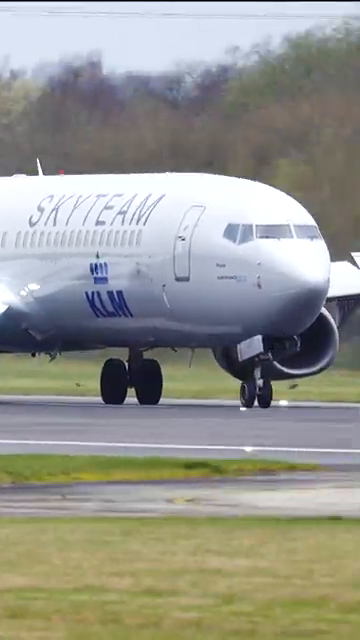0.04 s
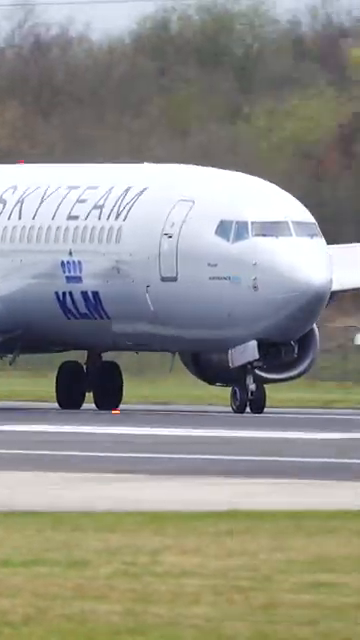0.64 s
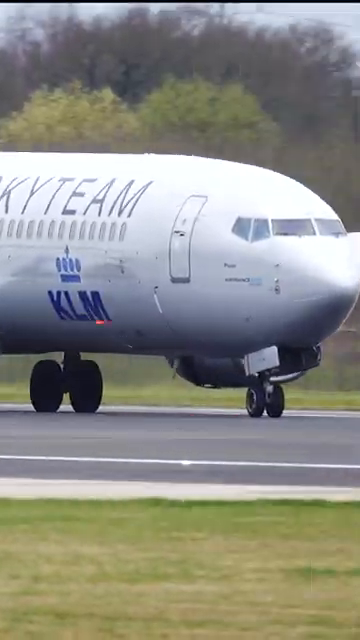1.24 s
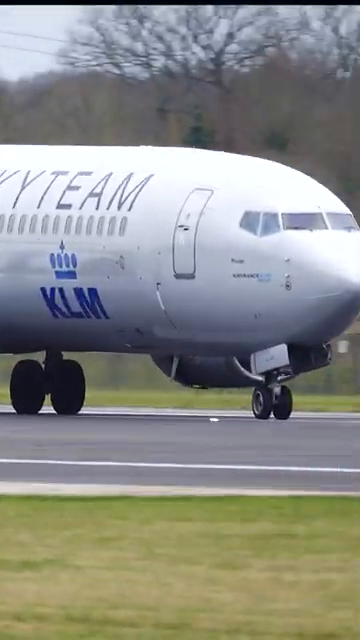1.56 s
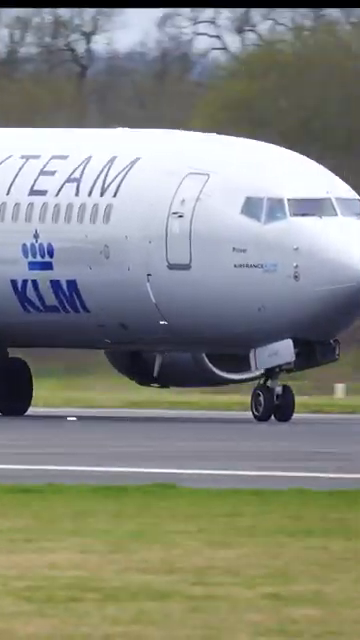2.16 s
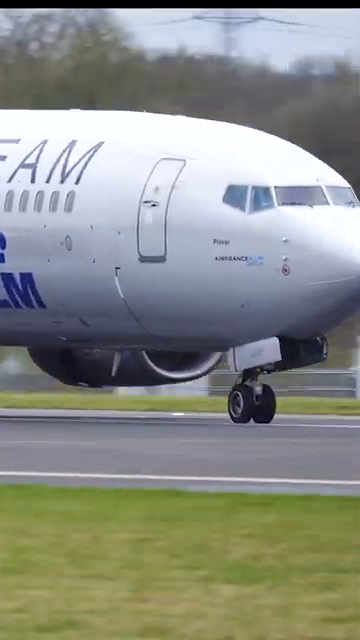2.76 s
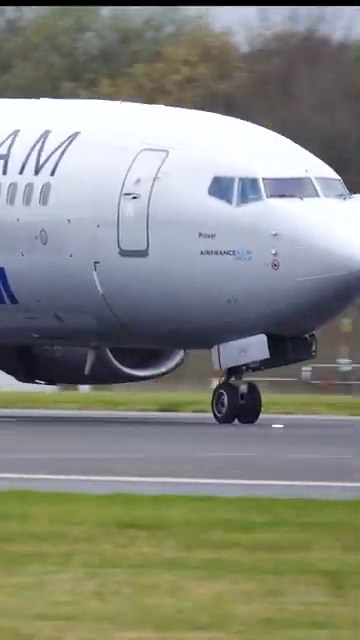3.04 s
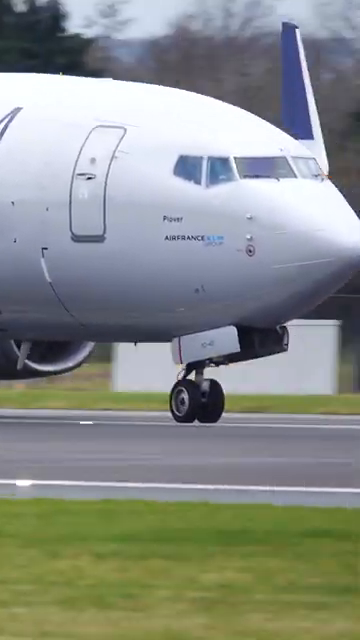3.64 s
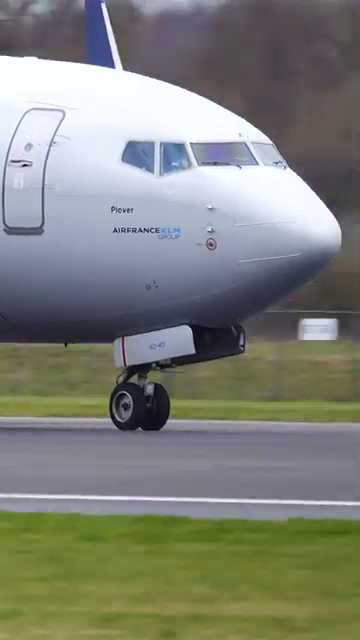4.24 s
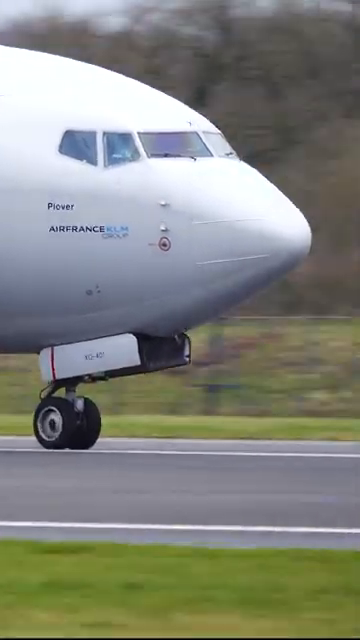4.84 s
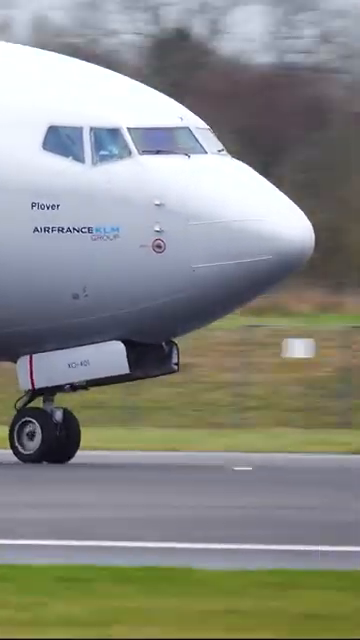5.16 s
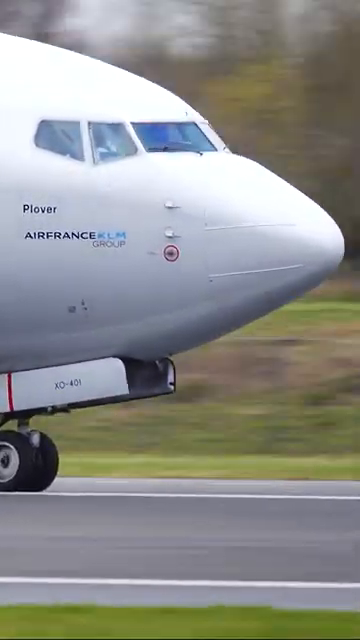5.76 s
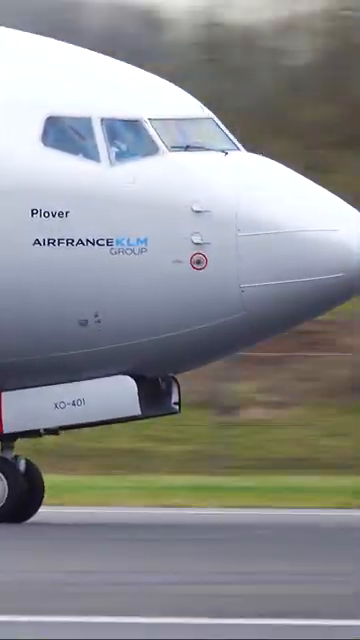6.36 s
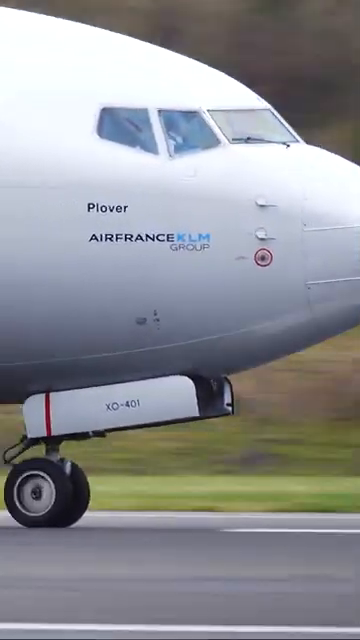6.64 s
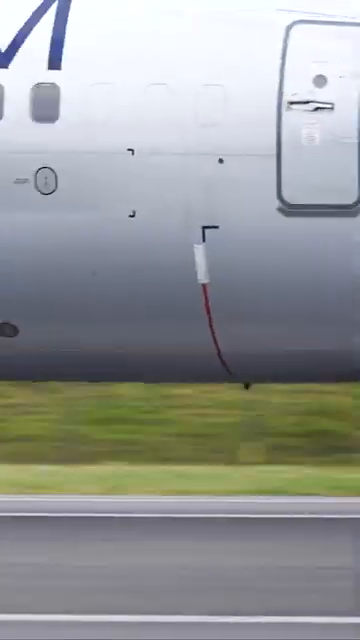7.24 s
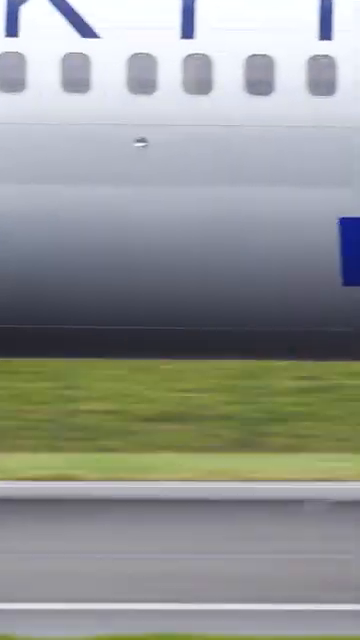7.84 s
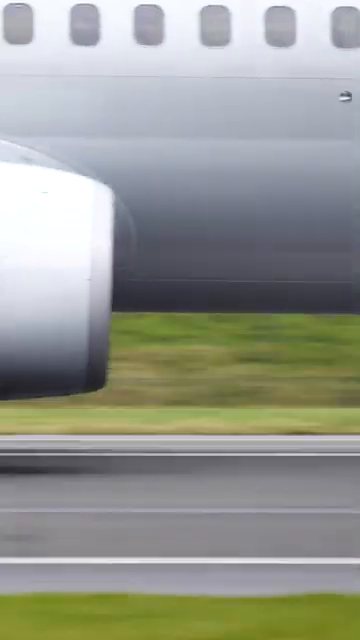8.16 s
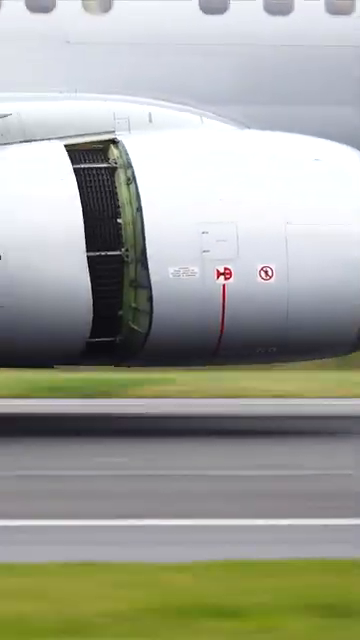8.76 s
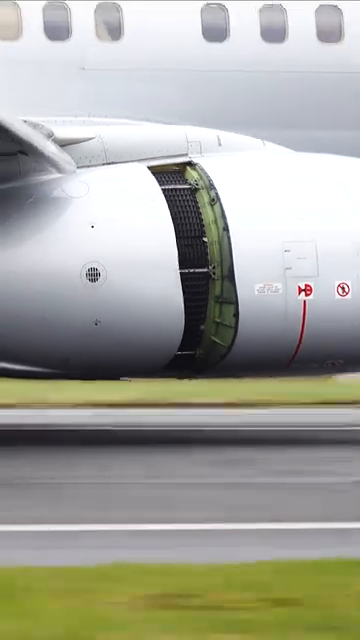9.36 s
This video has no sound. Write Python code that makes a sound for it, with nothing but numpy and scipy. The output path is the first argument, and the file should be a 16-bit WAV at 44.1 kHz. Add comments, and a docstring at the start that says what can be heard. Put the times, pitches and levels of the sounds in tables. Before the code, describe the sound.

Outdoors beside a runway, a lark's thin song sits over the deep rumble of a distant airliner. The jet rolls nearer on reverse thrust, moaning softly and giving two dull thumps, while a faint whine falls as the engines slow. The rumble gives way to a gusty roar and bright hiss, with a slow phasing sweep and a brief low hum as the aircraft comes alongside the microphone.

```python
"""A low, distant rumble is heard first, with a lark singing over it until the noise drowns the bird.
A jet airliner rolls down a runway on reverse thrust, comes closer and draws level with the listener.
The rumble of its turbulent exhaust, with a hollow moan and two dull thumps, gives way to the roar and
hiss of the reversers, and faint turbine whines sink as the engines slow. Interference between the
direct sound and its echo off the grass sweeps a comb through the noise."""
import sys
import numpy as np
from scipy import signal
from scipy.fft import rfft, irfft, next_fast_len
from scipy.io import wavfile
from scipy.ndimage import uniform_filter1d

SR = 44100
rng = np.random.default_rng(int(sys.argv[2]) if len(sys.argv) > 2 else 0)


def log_audio(samples):
    """Write samples as a 16-bit WAV file to the path given in sys.argv[1]."""
    # one column per channel
    frames = np.atleast_2d(samples).T
    # limit to full scale, then quantise
    limited = np.clip(frames, -1, 1)
    pcm = np.round(limited * 32767).astype(np.int16)
    wavfile.write(sys.argv[1], SR, pcm)


N = 414540
TIME = np.arange(N) / SR

# spectra of the reverser and exhaust noise: (frequency [Hz], relative density [dB])
ROAR_SPECTRUM = [(300, -28), (520, -1.3), (700, .4), (1000, 0), (1350, -1.9), (1700, -4.8), (2300, -8),
                 (4000, -32)]
HISS_SPECTRUM = [(900, -20.5), (1500, -3.5), (2000, -5), (2600, -1.7), (3250, 1.1), (3600, -2.4),
                 (3950, -4.1), (4400, -9.5), (5200, -27), (8000, -60)]
FIZZ_SPECTRUM = [(3400, -30.5), (4000, -4), (4500, 0.5), (5200, -1.5), (7000, -9.5), (8500, -15.5),
                 (10000, -27), (12000, -35), (15000, -46)]
RUMBLE_SPECTRUM = [(12, -28), (25, -19.5), (40, -13), (60, -3), (80, 1), (110, -0.5), (150, -5.5),
                   (185, -14.5), (240, -27), (500, -47.5)]
GROWL_SPECTRUM = [(90, -18.5), (150, 0.5), (230, 0), (340, -0.5), (480, -1.8), (620, -8.5), (850, -17.5),
                  (1600, -37)]
# their envelopes, before swells and echo: (time [s], level [dB])
ROAR_ENVELOPE = [(0, -29.3), (1.4, -29), (2.2, -27.9), (3, -29.5), (4.02, -29.6), (4.25, -24.6),
                 (5.45, -23.8), (5.7, -22.7), (6.9, -21.2), (8, -18.9), (9.4, -18.6)]
HISS_ENVELOPE = [(0, -41.5), (1, -40), (2, -35.7), (3.4, -33.7), (4.5, -27.6), (5.5, -26.6), (6, -19.2),
                 (7, -20.2), (7.5, -21.8), (9.4, -23.6)]
RUMBLE_ENVELOPE = [(0, -16), (.6, -16.2), (1.1, -14.7), (4, -15.4), (4.5, -18.3), (5.05, -15), (5.5, -15.5),
                   (5.9, -19.3), (7, -23), (7.5, -20.7), (8.3, -20.2), (9.4, -22.3)]
GROWL_ENVELOPE = [(0, -31.3), (1.05, -31.3), (1.4, -28), (2, -27.7), (2.6, -22.2), (3.2, -20.2),
                  (4.1, -18.9), (4.6, -21.7), (5.7, -20.5), (6.1, -23.2), (7, -24.5), (8.4, -23.3),
                  (9.4, -21.3)]
# brief swells of the jet noise: (time [s], half width [s], centre frequency [Hz], gain [dB])
SWELLS = [(1.68, .07, 900, 2), (2.08, .12, 1900, 2.1), (2.32, .1, 750, 2), (2.63, .11, 780, 4.5),
          (3.18, .08, 1900, 3), (3.25, .15, 440, 1.5), (3.67, .12, 1200, 3.3), (3.7, .15, 4500, 1.5),
          (4.2, .07, 500, 2.5), (4.44, .08, 2800, 2.3), (4.5, .17, 900, 2.8), (4.6, .22, 1600, 4.2),
          (4.85, .1, 4200, 2.2), (5.82, .08, 760, 4.5), (6.25, .2, 3300, 1.2), (6.92, .12, 2700, 1.6),
          (7.35, .25, 1300, 1.2), (8.04, .06, 900, 2), (9, .35, 600, 1.3)]
# path through the air from jet to listener: (time [s], distance [m])
JET_DISTANCE = [(0, 490), (2, 400), (4, 280), (5.3, 200), (5.7, 150), (7.5, 100), (9.4, 77)]
# echo off the grass, later as the jet nears: (time [s], delay [ms], depth of the bass dip [dB])
ECHO_PATH = [(0, 1.4, 2.5), (2, 1.4, 0), (4, 1.5, 10), (5.1, 1.86, 12), (6.4, 2.36, 10), (7.25, 2.74, 7),
             (8.05, 2.99, 7), (9.4, 3.1, 6)]
# reflection by the grass: (frequency [Hz], relative amplitude [ratio])
GRASS_REFLECTION = [(150, 0.071), (300, .3), (450, 0.82), (700, 1.2), (1500, 0.8), (2500, 0.36),
                    (4000, 0.12)]
# pitch of the slowing turbine: (time [s], frequency [Hz])
TURBINE_PITCH = [(2.7, 7000), (3.6, 5770), (4, 5270), (4.3, 5010), (4.9, 4840), (6, 4600), (6.7, 4330),
                 (7.2, 3880), (7.7, 3700)]
# its tones: (multiple of that pitch [ratio], level before losses [dB])
TURBINE_PARTIALS = [(1, -25.8), (1.81, -32), (1.96, -33.7)]
# moan of the distant engines, boom of the reverser abeam: (time [s], frequency [Hz], level [dB])
ENGINE_MOAN = [(1.1, 326.6, -37), (1.3, 317.4, -31.5), (1.599, 318, -32), (1.95, 320, -40), (2.5, 325, -31),
               (3.3, 325, -29), (4, 335, -29.5), (4.4, 340, -36)]
REVERSER_BOOM = [(7.6, 176, -38), (7.85, 171, -28.3), (8.45, 167.8, -28), (8.7, 168, -38)]
# two exhaust thumps and a clipping click on the louder: (time [s], peak level [dB], frequency [Hz])
THUMPS_AND_CLICK = [(3.2849, -4, 200), (3.2842, -12, 2450), (5.067, -10, 89)]
# lark song: (onset [s], length [s], start pitch [Hz], middle pitch [Hz], end pitch [Hz], level [dB])
LARK_NOTES = [(0, 0.063, 3440, 3360, 3350, -41), (.2, 0.046, 4100, 4550, 3850, -46),
              (.275, .036, 4750, 5000, 5280, -47.5), (.322, 0.047, 4780, 4300, 3800, -46),
              (.455, 0.08, 5450, 4500, 3830, -44.5), (.522, .135, 3950, 3480, 3330, -41.3),
              (.72, 0.055, 3980, 4250, 4400, -47), (.925, .065, 5480, 4900, 4000, -48),
              (1.06, .065, 4400, 5200, 4900, -53), (1.155, 0.07, 5300, 4350, 4000, -47),
              (1.28, .04, 5500, 5620, 5550, -56), (1.56, .06, 5000, 5530, 5300, -54),
              (1.67, 0.06, 5400, 4800, 4200, -48.5), (1.89, .06, 5000, 5400, 4700, -51),
              (1.955, .04, 4800, 5400, 5650, -51), (1.995, .05, 5600, 5000, 4300, -46.5),
              (2.22, .08, 4950, 5050, 4700, -52), (2.585, .05, 5850, 5920, 5880, -55),
              (2.69, .06, 5400, 5000, 4400, -49.5), (2.86, .045, 5250, 5070, 4800, -51)]
# microphone response, a steep shelf in the treble: (frequency [Hz], gain [dB])
TREBLE_SHELF = [(20, 2), (3350, -3), (3600, -3.5), (3900, -12), (4200, -18.6), (4700, -18), (16000, -17.5)]
# its left side takes a little more bass: (frequency [Hz], gain on the left and cut on the right [dB])
BASS_BALANCE = [(30, 0.1), (130, 0.11), (260, 0)]


def reversers(fizz_below_hiss_db=16.4, fizz_loss_db_per_m=.024):
    """Turbulence in the reversed flow roars and hisses; a fizz follows the hiss, fainter with distance."""
    def levels(t):
        (roar,), (hiss,) = follow(ROAR_ENVELOPE, t), follow(HISS_ENVELOPE, t)
        distance, = follow(JET_DISTANCE, t)
        return roar, hiss, hiss - fizz_below_hiss_db - fizz_loss_db_per_m * distance
    return jet_noise((ROAR_SPECTRUM, HISS_SPECTRUM, FIZZ_SPECTRUM), levels, 2048, gust_db=.25, gust_hz=5)


def exhaust():
    """Turbulent mixing of the exhaust radiates a low rumble and a growl."""
    def levels(t):
        return follow(RUMBLE_ENVELOPE, t)[0], follow(GROWL_ENVELOPE, t)[0]
    return jet_noise((RUMBLE_SPECTRUM, GROWL_SPECTRUM), levels, 4096, gust_db=.4, gust_hz=4)


def jet_noise(spectra, levels, frame_size, gust_db, gust_hz):
    """Incoherent mixing regions add in power; absorption dulls each, and its envelope sets its level."""
    hz, t, noise = short_spectra(rng.standard_normal(N), frame_size)
    at = np.minimum(t * SR, N - 1).astype(int)
    air = amp(-air_loss_db(hz, t, db_per_m_at_4khz=.025))
    shelf = amp(colour(TREBLE_SHELF, hz))
    power = 0
    for spectrum, level_db in zip(spectra, levels(t)):
        shape = amp(colour(spectrum, hz)) * air
        gain = amp(level_db + gust_db * wander(gust_hz)[at])
        power += (shape * gain) ** 2 / np.mean((shape * shelf) ** 2, axis=0)
    return waveform(noise * np.sqrt(power) * swells(hz, t) * ground_echo(hz, t))


def swells(hz, t, half_width_octaves=.6):
    """Amplitude modulation: each swell lifts the noise by a Gaussian bell in time and in pitch."""
    peak_s, half_width_s, centre_hz, db = np.transpose(SWELLS)
    in_pitch = np.exp(-(np.log2((hz + 1) / centre_hz) / half_width_octaves) ** 2)
    in_time = np.exp(-((t[:, None] - peak_s) / half_width_s) ** 2)
    return amp((db * in_pitch) @ in_time.T)


def turbine_whine(spread_hz=55, turn_away_s=6.1, fade_db_per_s=8):
    """Scattering in hot exhaust broadens the tones; beamed forward, they fade as the intakes turn away."""
    pitch_hz, = follow(TURBINE_PITCH, TIME)
    away_db = fade_db_per_s * np.maximum(TIME - turn_away_s, 0)
    out = np.zeros(N)
    for multiple, db in TURBINE_PARTIALS:
        hz = multiple * pitch_hz
        phase = phase_of(hz)
        narrow_band = wander(spread_hz) * np.cos(phase) + wander(spread_hz) * np.sin(phase)
        out += amp(db - away_db - air_loss_db(hz, TIME, db_per_m_at_4khz=.043)) * narrow_band
    return gate(TURBINE_PITCH) * out


def engine_tone(rows, blur, blur_hz, fading_db):
    """Turbulent air modulates a gliding tone in frequency and amplitude, so it blurs and fades."""
    hz, level_db = follow(rows, TIME)
    phase = phase_of(hz * (1 + blur * wander(blur_hz)))
    return np.sqrt(2) * gate(rows) * amp(level_db + fading_db * wander(8.1)) * np.sin(phase)


def thumps_and_click():
    """Two dull exhaust thumps and a thin click of clipping on the louder; each is one pressure swing."""
    out = np.zeros(N)
    for centre_s, db, hz in THUMPS_AND_CLICK:
        near = abs(TIME - centre_s) < 1 / hz
        phase = 2 * np.pi * hz * (TIME[near] - centre_s)
        out[near] += amp(db) * phase * np.exp((1 - phase ** 2) / 2)
    return out


def ground_echo(hz, t, strength_far=.15, strength_near=.47, lag_far_rad=2.1, lag_near_rad=.5):
    """Direct and reflected sound interfere in a comb whose teeth close up and deepen as the jet nears."""
    delay_ms, depth_db = follow(ECHO_PATH, t)
    steepness = (delay_ms - delay_ms.min()) / np.ptp(delay_ms)  # 0 at grazing, 1 abeam
    strength = strength_far + (strength_near - strength_far) * steepness ** 2.3
    lag = lag_near_rad + (lag_far_rad - lag_near_rad) * (1 - steepness) ** 4.5
    reflection = np.clip(strength * colour(GRASS_REFLECTION, hz), 0, .9)
    phase = 2 * np.pi * hz * delay_ms / 1000 + lag
    comb = abs(1 + reflection * np.exp(-1j * phase)) / np.sqrt(1 + reflection ** 2)
    dip_hz = 270 / delay_ms ** .63  # the soft ground cancels one narrow band of the bass
    octaves_off = np.log2((hz + 1) / dip_hz)
    return comb * amp(-depth_db / (1 + (octaves_off / .24) ** 2))


def air_loss_db(hz, t, db_per_m_at_4khz):
    """Atmospheric absorption grows with distance and with the square of frequency."""
    distance, = follow(JET_DISTANCE, t)
    return db_per_m_at_4khz * distance * (hz / 4000) ** 2


def scintillation(x, shared_db=.55, shared_hz=16, rasp_db=1.0, rasp_hz=71, patchy_db=.99):
    """Eddies in the air modulate the amplitude, most in the treble, both as a whole and band by band."""
    hz, t, spectra = short_spectra(x, 256)
    at = np.minimum(t * SR, N - 1).astype(int)
    patches = uniform_filter1d(rng.standard_normal(spectra.shape), size=5, axis=0)
    patches = unit(uniform_filter1d(patches, size=50, axis=1))
    flutter_db = shared_db * wander(shared_hz)[at] + rasp_db * wander(rasp_hz)[at] + patchy_db * patches
    treble_weight = np.sqrt(np.minimum(hz / 2500, 1.6))  # the depths hold as given at 2.5 kHz
    return waveform(spectra * amp(flutter_db * treble_weight))


def lark(waver=.008, flutter_db=3, trill_depth=.027, trill_hz=240):
    """Each whistle bends through three pitches; fast, uneven frequency modulation makes it raspy."""
    trill = np.sin(phase_of(trill_hz * (1 + .2 * wander(30))))
    pitch_factor = 1 + waver * wander(150) + trill_depth * trill
    out = np.zeros(N)
    for onset_s, length_s, *pitches, db in LARK_NOTES:
        start, count = round(onset_s * SR), round(length_s * SR)
        note = slice(start, start + count)
        glide_hz = np.polyval(np.polyfit([0, .5, 1], pitches, 2), np.linspace(0, 1, count))
        envelope = np.sqrt(2) * amp(db) * signal.windows.tukey(count, .25)
        out[note] += envelope * np.sin(phase_of(glide_hz * pitch_factor[note]))
    return out * amp(flutter_db * wander(90))


def noise_floor(hz, start_db=-59.6, fall_db_per_s=2.15, corner_hz=4200):
    """High-passed noise, partly correlated between channels, gives a faint hiss that sinks steadily."""
    white = rng.standard_normal(N) + 1.3 * rng.standard_normal((2, N))
    treble = irfft(rfft(white) / (1 + (corner_hz / (hz + 1)) ** 4), N)
    return amp(start_db - fall_db_per_s * TIME) * unit(treble)


def amp(db):
    """Decibels to amplitude ratio."""
    return np.exp(np.asarray(db) * (np.log(10) / 20))


def unit(x):
    """Normalisation to rms 1."""
    return x / np.sqrt(np.mean(x ** 2) + 1e-20)


def phase_of(hz):
    """Phase is the time integral of angular frequency."""
    return 2 * np.pi * np.cumsum(hz) / SR


def gate(rows, ramp_s=.1):
    """Trapezoidal envelope over the time span of a table."""
    return np.clip(np.minimum(TIME - rows[0][0], rows[-1][0] - TIME) / ramp_s, 0, 1)


def follow(rows, t):
    """Linear interpolation of a table's columns at the times t."""
    times, *columns = np.transpose(rows)
    return [np.interp(t, times, column) for column in columns]


def colour(points, hz):
    """Interpolation of a spectrum on a log-frequency axis."""
    frequencies, values = np.transpose(points)
    return np.interp(np.log(hz + 1), np.log(frequencies), values)


def short_spectra(x, size):
    """Short-time Fourier analysis: frequencies (as a column), times and spectra."""
    hz, t, spectra = signal.stft(x, SR, nperseg=size, noverlap=size - size // 4)
    return hz[:, None], t, spectra


def waveform(spectra):
    """Overlap-add synthesis from short-time spectra."""
    size = 2 * (len(spectra) - 1)
    return signal.istft(spectra, nperseg=size, noverlap=size - size // 4)[1][:N]


def wander(rate_hz, step=32):
    """Low-passed random fluctuation of rms 1, with little above the given rate."""
    count = next_fast_len(N // step + 2)
    hz = np.fft.rfftfreq(count, step / SR)
    coarse = unit(irfft(rfft(rng.standard_normal(count)) / (1 + (hz / rate_hz) ** 2), count))
    return np.interp(TIME, np.arange(count) * step / SR, coarse)


def scene():
    """Superposition of the far sources, which arrive alike in both channels."""
    mixing_noise = exhaust() + reversers()
    boom = engine_tone(REVERSER_BOOM, blur=.02, blur_hz=26, fading_db=2)
    moan = engine_tone(ENGINE_MOAN, blur=.09, blur_hz=40, fading_db=2.5)
    jet = scintillation(mixing_noise + turbine_whine()) + boom + moan + thumps_and_click()
    field = jet + lark()
    return np.array([field, field])


def record(dry):
    """Frequency response of the microphone, then faint hiss, full-scale clipping and a band limit."""
    hz = np.fft.rfftfreq(N, 1 / SR)
    balance_db = np.array([[1], [-1]]) * colour(BASS_BALANCE, hz)
    shelved = irfft(rfft(dry) * amp(colour(TREBLE_SHELF, hz) + balance_db), N)
    clipped = np.clip(shelved + noise_floor(hz), -1, 1)
    low_pass = signal.firwin(511, cutoff=15760, window=("kaiser", 9), fs=SR)
    return signal.oaconvolve(clipped, low_pass[None], "same")


dry = scene()
out = record(dry)
log_audio(out)
```